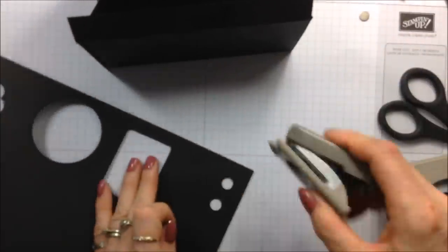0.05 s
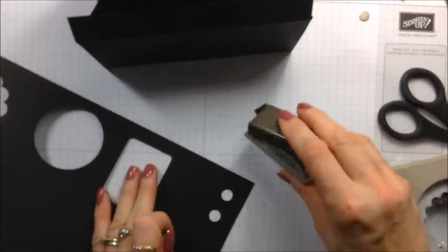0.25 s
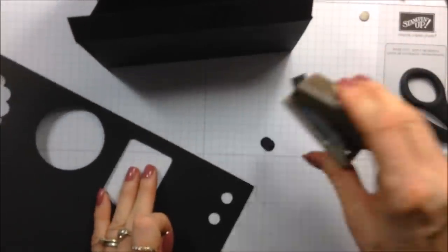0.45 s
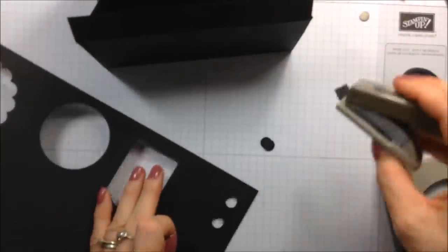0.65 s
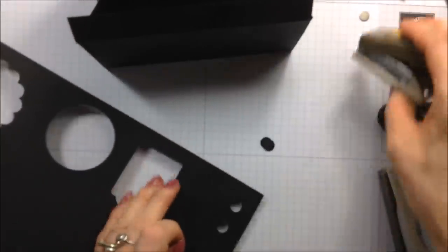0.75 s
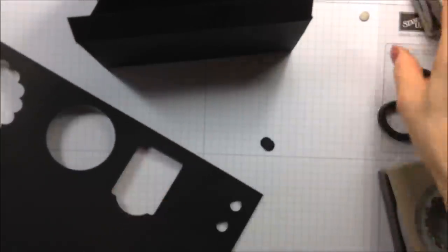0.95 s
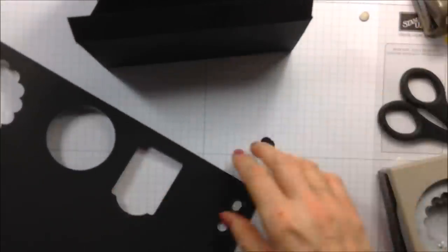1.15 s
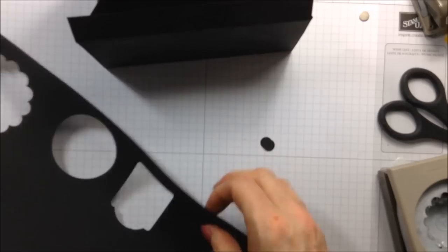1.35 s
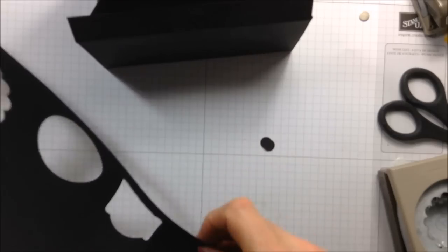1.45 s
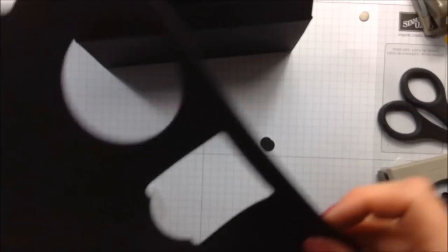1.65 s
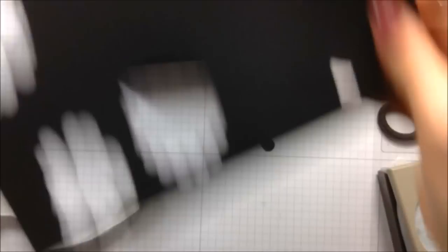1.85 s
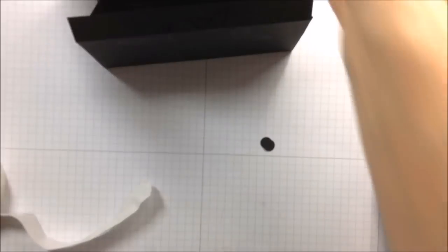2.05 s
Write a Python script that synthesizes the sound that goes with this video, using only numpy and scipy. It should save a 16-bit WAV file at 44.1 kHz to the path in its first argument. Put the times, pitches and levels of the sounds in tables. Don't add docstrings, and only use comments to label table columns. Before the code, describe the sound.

Hand punch handled on a craft table: lever clacks, a hard rattling set-down, then crisp card rustling

```python
import sys
import numpy as np
from scipy import signal
from scipy.fft import rfft, irfft, next_fast_len
from scipy.io import wavfile
from scipy.ndimage import uniform_filter1d

SR = 44100
rng = np.random.default_rng(int(sys.argv[2]) if len(sys.argv) > 2 else 0)


def wrap_up_sound(samples):
    columns = np.atleast_2d(samples).T
    tamed = np.clip(columns, -1, 1)
    steps = np.round(tamed * 32767).astype(np.int16)
    wavfile.write(sys.argv[1], SR, steps)


def invert_db(x):
    u = np.asarray(x, float) / 20
    return 10 ** u


N = 91860
T = np.arange(SR // 2) / SR


def unit(x):
    return x / np.sqrt(np.mean(x ** 2) + 1e-20)


def along(points, hz):
    f, value = np.transpose(points)
    return np.interp(np.log(hz + 1), np.log(f + 1), value)


def filtered(x, response):
    m = next_fast_len(len(x) + 8192)
    spectrum = rfft(x, m) * response(np.fft.rfftfreq(m, 1 / SR))
    return irfft(spectrum, m)[:len(x)]


def peak(f, hz, width):
    return 1j * f * width / (hz * hz - f * f + 1j * f * width)


def add(out, s, x):
    out[round(s * SR):][:len(x)] += x


def onset(rise_s):
    return 1 - np.exp(-T / rise_s)


def ring(modes, scatter_db):
    hz, db, t60 = np.transpose(modes)[:, :, None]
    db = db + scatter_db * rng.standard_normal(hz.shape)
    return invert_db(db - 60 * T / t60) * np.sin(2 * np.pi * hz * T)


def rattle(peaks, low_db, high_db, t60, strike):
    burst = rng.standard_normal(len(T)) * invert_db(-60 * T / t60) * onset(0.00044)
    burst[:3] += strike

    def body(f):
        total = 0
        for k, (hz, width, db) in enumerate(peaks):
            gain_db = db + band_db(hz, low_db, high_db)
            total = total + (-1) ** k * invert_db(gain_db) * peak(f, hz, width)
        return total

    return filtered(burst, body)


def band_db(hz, low_db, high_db):
    return high_db if hz > 5500 else low_db


def stroke(rows, colour, grit_db, patchy_db):
    s, level_db, tilt = np.transpose(rows)
    n = round((s[-1] - s[0]) * SR) + 1024
    bumps = uniform_filter1d(rng.standard_normal(n), size=16) * 4
    grit = rng.standard_normal(n) * invert_db(grit_db * bumps)
    hz, t, z = signal.stft(unit(filtered(grit, colour)), SR, nperseg=256)
    patches = uniform_filter1d(rng.standard_normal(z.shape), size=14, axis=0)
    patches = unit(uniform_filter1d(patches, size=2, axis=1))
    octaves = np.log2((hz[:, None] + 200) / 4000)
    shape = invert_db(octaves * np.interp(t + s[0], s, tilt) + patchy_db * patches)
    x = signal.istft(z * shape, SR, nperseg=256)[1][:n]
    at = s[0] + np.arange(n) / SR
    fade = np.clip((s[-1] - at) * 200, 0, 1)
    return x * invert_db(np.interp(at, s, level_db)) * fade


# (f/Hz, level/dB per Hz)
FLOOR = [(24, -64), (40, -40.5), (218, -7), (260, -13), (591, -17.5), (1160, -26), (1380, -16.5),
         (1820, -26.5), (15500, -33.5)]
# (f/Hz, width/Hz, level/dB)
HUMS = [(153.8, 49, -69), (611, 27, -81), (1400, 23, -80)]


def hush():
    out = invert_db(-69) * unit(filtered(rng.standard_normal(N), lambda f: invert_db(along(FLOOR, f))))
    for hz, width, db in HUMS:
        hum = filtered(rng.standard_normal(N), lambda f: peak(f, hz, width) ** 2)
        out += invert_db(db) * unit(hum)
    return out


# (f/Hz, level/dB per Hz)
CARD_COLOUR = [(180, -87), (300, -23), (756, -9), (835, -25.5), (953, -10.5), (1910, -2), (2320, -3),
               (10600, -7.5), (15500, -18)]


def card(f):
    return invert_db(along(CARD_COLOUR, f)) * (f > 150)


# (t/s, level/dB, brightness/dB per octave)
SLIDE = [(0, -39.5, -0.5), (0.028, -39.5, 0), (.052, -46.5, 0), (.106, -43, 2), (.16, -43, -0.5),
         (.222, -46.5, -2), (.26, -57.5, -2), (.33, -65.5, -11.5), (.36, -53, -3.5), (0.429, -69.5, -2)]


def card_slide():
    out = np.zeros(N + SR)
    add(out, SLIDE[0][0], stroke(SLIDE, card, grit_db=1.5, patchy_db=2.5))
    return out[:N]


# (f/Hz, level/dB, t60/s)
BOX_MODES = [(170, -8, .14), (212, 0, .045), (295, -7, .13), (385, -3, .08), (510, -5, .06),
             (680, -11, .045), (830, -16, .035)]


def hollow_thud(damping, scatter_db, rise_s):
    modes = np.array(BOX_MODES) * [1, 1, damping]
    return ring(modes, scatter_db).sum(0) * onset(rise_s)


# (t/s, low rattle level/dB, high rattle level/dB, thud level/dB, t60/s)
CLACKS = [
    (0.3083, -40, -27, -70, 0.0042),
    (0.3157, -31, -28.5, -24, 0.027),
    (0.3181, -25, -25.5, -67, 0.02),
    (0.4541, -54, -30, -68, .003),
    (0.4577, -29.5, -29, -22, 0.025),
]
# (f/Hz, width/Hz, level/dB)
LEVER_PEAKS = [(1490, 1500, -13), (2950, 870, -6), (4200, 750, -4.5), (6500, 1180, -6.5), (7870, 730, -4.5),
               (9200, 860, 0), (11300, 1900, -9), (13500, 900, -9)]


def lever():
    out = np.zeros(N + SR)
    gripped_s, grip_damping = .4, 2.2
    for s, low_db, high_db, thud_db, t60 in CLACKS:
        peaks = np.array(LEVER_PEAKS) * [1, grip_damping if s > gripped_s else 1, 1]
        thud = hollow_thud(damping=1, scatter_db=.5, rise_s=0.0005)
        scrape = rattle(peaks, low_db, high_db, t60, strike=0.86)
        add(out, s, 0.38 * invert_db(thud_db) * thud + 3 * scrape)
    return out[:N]


# (f/Hz, level/dB, t60/s)
BLADE_MODES = [(1863, -17, .02), (2934, -3, .04), (4200, -5, .04), (7693, -13, .04), (9600, 0, .035),
               (11500, -14, .03), (13550, -10, .04)]
# (t/s, low modes level/dB, high modes level/dB)
BLADE_HITS = [
    (0.318, -22.5, -21.5),
    (.4583, -41, -28.5),
]


def blade():
    out = np.zeros(N + SR)
    free_s, held_t60 = 0.0051, 0.013
    shape = onset(0.0011) * invert_db(-60 * np.maximum(T - free_s, 0) / held_t60)
    for s, low_db, high_db in BLADE_HITS:
        gains = invert_db([band_db(hz, low_db, high_db) for hz, _, _ in BLADE_MODES])
        add(out, s, gains @ ring(BLADE_MODES, scatter_db=0.5) * shape)
    return out[:N]


# (t/s, peak level/dB, centre f/Hz, t60/s, width over centre)
SNAPS = [(.526, -54, 2420, 0.027, .6), (0.5799, -51.5, 2160, .05, 0.54), (0.612, -39, 2410, 0.054, 0.37),
         (.6195, -35.5, 6000, .02, 0.76), (0.7193, -40, 2880, 0.035, 0.26), (.7262, -29, 8800, .02, 0.49),
         (0.728, -31.5, 2800, 0.056, 0.21), (0.8139, -27, 2150, .028, .7), (0.814, -33, 1120, .025, .8),
         (0.8259, -36.5, 2800, 0.019, 1.2), (.903, -43, 2000, 0.057, 1), (.941, -42, 3300, 0.022, 0.53),
         (1.154, -32, 9560, .011, 0.49), (1.196, -51, 11000, 0.011, 0.42),
         (1.308, -45.5, 8980, 0.023, 0.99), (1.3155, -45, 8920, .02, .9), (1.343, -40, 2290, .02, 1.2),
         (1.3472, -29.5, 3690, 0.039, 0.54), (1.3595, -46, 2500, .02, 1.3), (1.3665, -38, 3930, .02, .5),
         (1.398, -25.5, 1920, 0.063, 0.81), (1.3979, -25, 6000, .008, 1), (1.4175, -29.5, 1680, 0.029, 1.7),
         (1.4385, -36, 4200, .03, 0.33), (1.4406, -25, 3520, 0.035, .6), (1.4425, -26.5, 2000, 0.039, 1.7),
         (1.4555, -41, 3580, 0.026, 0.33), (1.4597, -34, 3600, 0.02, 0.66), (1.51, -43, 3590, 0.018, 1.1),
         (1.524, -48, 1480, 0.067, 0.64), (1.602, -33.5, 4180, 0.067, 0.65), (1.658, -38.5, 2960, .01, 2.1),
         (1.699, -32.5, 2800, 0.016, 0.96), (1.698, -39, 1120, 0.081, 0.95),
         (1.7318, -37, 1500, 0.034, 1.06), (1.732, -39, 4960, .01, 0.44), (1.7333, -36.5, 860, 0.069, 1.4),
         (1.828, -47.5, 4450, 0.036, 0.71), (1.884, -40.5, 1400, 0.029, .8),
         (1.916, -48.5, 4000, 0.02, 0.77)]


def snaps():
    out = np.zeros(N + SR)
    for s, db, hz, t60, share in SNAPS:
        decay = 0.59 * invert_db(-60 * T / 0.0013) + 0.18 * invert_db(-60 * T / t60)
        burst = rng.standard_normal(len(T)) * decay
        burst[0] += 1.5
        burst = filtered(burst, lambda f: peak(f, hz, share * hz) ** 2 + 0.014 * f / (f + hz))
        add(out, s, invert_db(db) * burst / np.abs(burst).max())
    return out[:N]


# (f/Hz, width/Hz, level/dB)
SHELL_PEAKS = [(2000, 2700, -4.5), (2800, 600, 4), (5463, 1500, -17), (8720, 2100, -6),
               (12680, 3000, -17.5)]
# (t/s, level/dB, brightness/dB per octave)
GRIP = [(.575, -65, 0), (.584, -62.5, -7), (.606, -71.5, 4), (.609, -56, -5.5), (.62, -47.5, 1.5),
        (.65, -58.5, -1.5), (.695, -71.5, -1)]
SCUFF = [(.7, -58.5, -1), (.717, -57, 0.5), (0.719, -40.5, 3), (0.729, -37, 3), (0.769, -51.5, -1),
         (.808, -46.5, 0.5), (.835, -56.5, -2), (.86, -66.5, -7)]
REACH = [(0.881, -66.5, -3.5), (0.904, -56, -2.5), (.92, -65, -6), (0.943, -60, -3), (.97, -68.5, -1.5),
         (1.003, -68, -10)]


def hand_scuffs():
    out = np.zeros(N + SR)

    def shell(f):
        return np.sqrt(sum(abs(invert_db(db) * peak(f, hz, width)) ** 2 for hz, width, db in SHELL_PEAKS))

    for rows in (GRIP, SCUFF, REACH):
        add(out, rows[0][0], stroke(rows, shell, grit_db=2.5, patchy_db=0.2))
    return out[:N]


# (t/s, ring level/dB, low rattle level/dB, high rattle level/dB, thud level/dB)
LANDINGS = [
    (1.0129, -34, -19, -20.5, -11),
    (1.0155, -16, -16, -20, -39),
    (1.038, -5.5, -11, -10, -24),
    (1.048, -29.5, -23, -37.5, -25),
    (1.0698, -14.5, -10.5, -15.5, -20.5),
    (1.054, -40, -34.5, -31, -43.5),
    (1.113, -45, -40, -56, -35),
]
# (f/Hz, level/dB, t60/s)
BODY_MODES = [(2510, -13, .05), (2695, -3, .07), (2832, 0, .07), (2935, -13, .04), (3380, -15, .04),
              (3930, -11, .04), (4090, -10, .035)]
# (f/Hz, width/Hz, level/dB)
RATTLE_PEAKS = [(1022, 1500, -10), (2784, 270, 2), (4000, 900, -0.5), (5290, 1900, -6.5), (7205, 720, 1.5),
                (9020, 1100, -2), (10300, 970, 1), (13300, 3000, -12)]
# (f/Hz, level/dB, t60/s)
TABLE_MODES = [(177, -7, 0.035), (246, 8, 0.035), (319.5, -4.5, .07), (403, -8, .06), (477.5, -10, 0.073),
               (563, -13, .06), (738, -14.5, 0.059)]
# (t/s, level/dB, f/Hz, t60/s)
PINGS = [(1.0127, -17, 4500, 0.017), (1.0165, -19.5, 4100, 0.025), (1.017, -21.5, 6900, .015),
         (1.016, -25, 13800, .015), (1.02, -24, 11000, 0.0092), (1.0384, -11, 10500, .016),
         (1.0392, -12, 7150, .02), (1.0465, -22.5, 12600, .012), (1.0663, -25, 7500, 0.023),
         (1.0699, -14, 3800, .012), (1.0698, -11, 2900, .014), (1.071, -17.5, 11100, 0.022),
         (1.1103, -30.5, 2800, 0.026)]


def landings():
    steel, rest = np.zeros((2, N + SR))
    signs = (-1.) ** np.arange(len(BODY_MODES))
    for s, ring_db, low_db, high_db, thud_db in LANDINGS:
        thud = ring(TABLE_MODES, scatter_db=3).sum(0) * onset(0.0021)
        parts = rattle(RATTLE_PEAKS, low_db, high_db, t60=0.031, strike=1.95)
        add(steel, s, .5 * invert_db(ring_db) * signs @ ring(BODY_MODES, scatter_db=1.5))
        add(rest, s, 0.47 * invert_db(thud_db) * thud + 3 * parts)
    for s, db, hz, t60 in PINGS:
        add(rest, s, ring([(hz, db, t60)], scatter_db=0)[0] * onset(0.00042))
    return steel[:N], rest[:N]


# (t/s, level/dB)
KNOCKS = [
    (1.16, -58.5),
    (1.307, -52),
    (1.44, -46.5),
    (1.732, -63),
    (1.889, -54),
]


def edge_knocks():
    out = np.zeros(N + SR)
    for s, db in KNOCKS:
        add(out, s, invert_db(db) * hollow_thud(damping=.3, scatter_db=4.5, rise_s=0.00074))
    return out[:N]


# (t/s, level/dB, brightness/dB per octave)
LIFT = [(1.325, -67, -9.5), (1.346, -42, -0.5), (1.358, -45, -1), (1.382, -47, 2.5), (1.394, -55, -4),
        (1.414, -51, 3), (1.433, -46, -3), (1.462, -39, -2), (1.49, -78, 9)]
BEND = [(1.491, -66, 4), (1.524, -51.5, -1.3), (1.548, -55, 1.2), (1.576, -48, 5), (1.62, -56.5, 1.5),
        (1.691, -58, 2), (1.729, -52.5, 0.5), (1.759, -66, 2), (1.787, -82, 2)]
DRAW = [(1.823, -84, -1), (1.827, -60.5, -5.5), (1.86, -56.5, -5), (1.886, -52, -4.5), (1.897, -91, -1),
        (1.94, -87, -1.2)]
# (f/Hz, width/Hz, level/dB)
EDGE = (5300, 1200, 2)


def card_lift():
    out = np.zeros(N + SR)
    hz, width, db = EDGE

    def edge(f):
        return card(f) * (1 + invert_db(db) * abs(peak(f, hz, width)) ** 2)

    for rows, colour in ((LIFT, card), (BEND, card), (DRAW, edge)):
        add(out, rows[0][0], stroke(rows, colour, grit_db=2, patchy_db=3.5))
    return out[:N]


# (f/Hz, t60/s)
ROOM_DECAY = [(200, 0.43), (1000, 0.32), (3000, 0.24), (8000, 0.17), (15000, 0.17)]


def room(x, size):
    out = np.zeros(N + SR)
    for start in range(0, N, size):
        hz, t, z = signal.stft(rng.standard_normal(SR // 2), SR, nperseg=256)
        shape = invert_db(-60 * t / along(ROOM_DECAY, hz)[:, None]) * (hz[:, None] > 100)
        tail = signal.istft(z * shape, SR, nperseg=256)[1]
        tail = tail / np.linalg.norm(tail)
        add(out, start / SR + .004, signal.fftconvolve(x[start:start + size], tail))
    return out[:N]


SEND_DB = [-19, -12.5, -12.5, -13.5]


def scene():
    steel, rest = landings()
    rustle = card_slide() + snaps() + hand_scuffs() + edge_knocks() + card_lift()
    parts = np.array([steel + blade(), rest, lever(), rustle])
    return (parts.sum(0) + room(invert_db(SEND_DB) @ parts, size=2048) + hush())[None]


def roll_off(x):
    return signal.sosfilt(signal.butter(12, 16600, fs=SR, output="sos"), x)


def record(dry):
    x = filtered(dry[0], lambda f: (1j * f / (75 + 1j * f)) ** 5 / (1 + (f / 15300) ** 40))
    ceiling = .9
    x = x / (1 + abs(x / ceiling) ** 6) ** (1 / 6)
    return roll_off(x[None])


dry = scene()
out = record(dry)
wrap_up_sound(out)
```